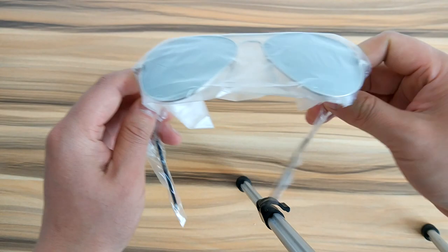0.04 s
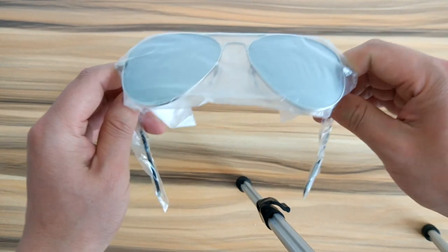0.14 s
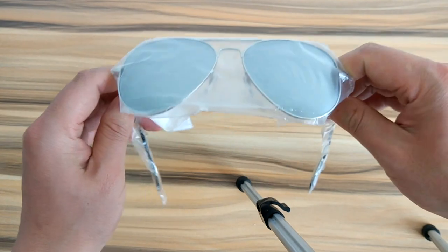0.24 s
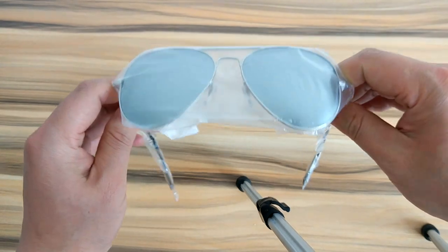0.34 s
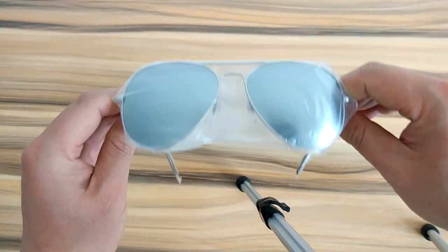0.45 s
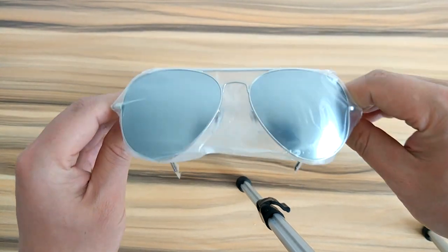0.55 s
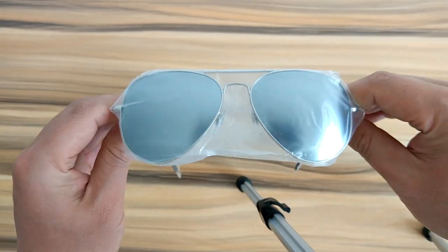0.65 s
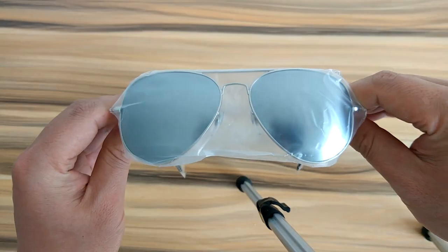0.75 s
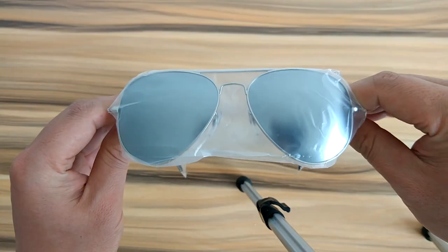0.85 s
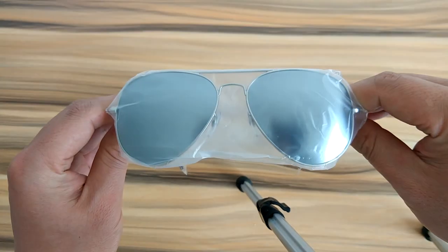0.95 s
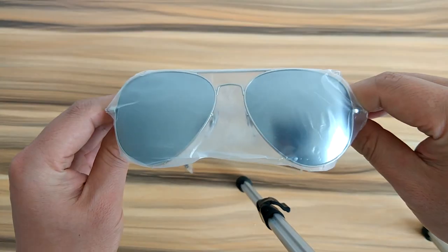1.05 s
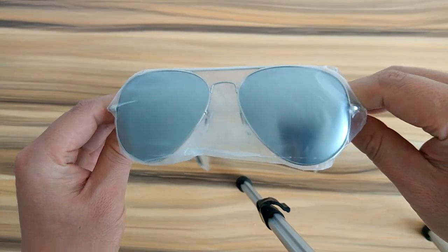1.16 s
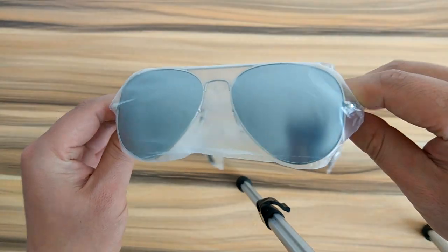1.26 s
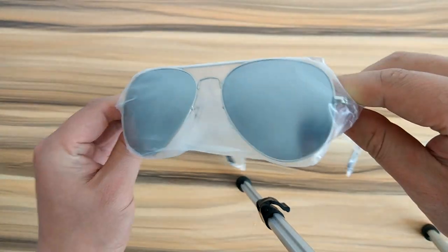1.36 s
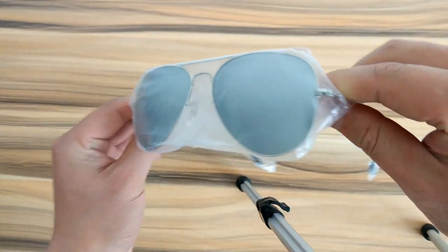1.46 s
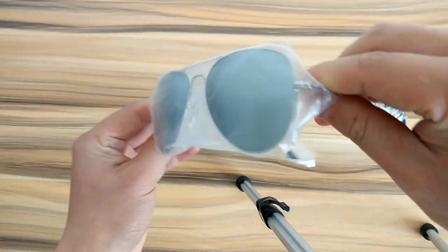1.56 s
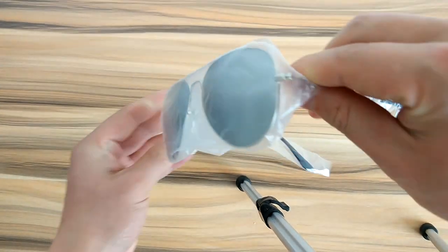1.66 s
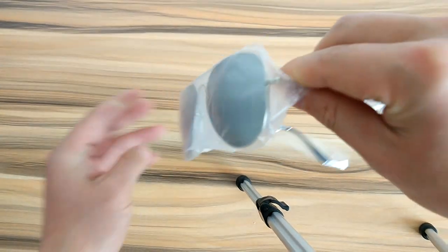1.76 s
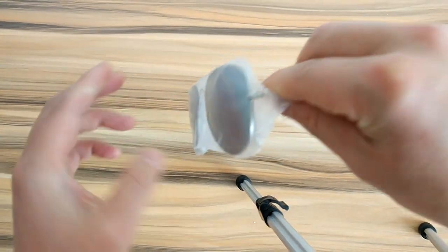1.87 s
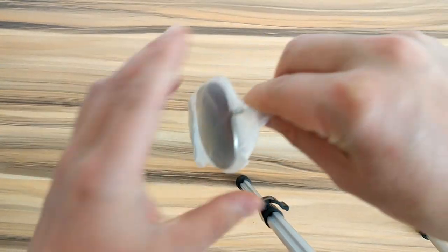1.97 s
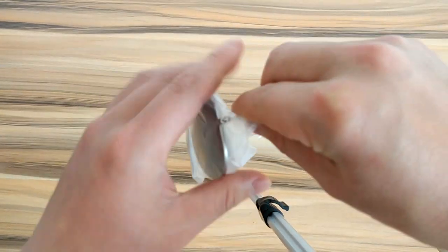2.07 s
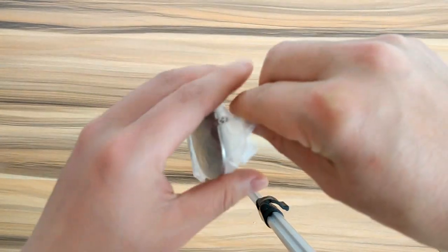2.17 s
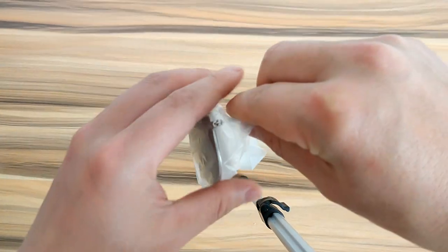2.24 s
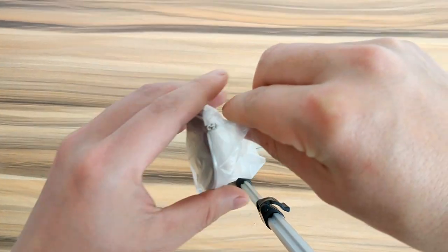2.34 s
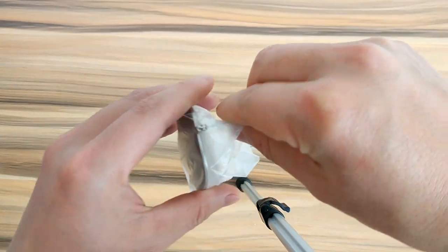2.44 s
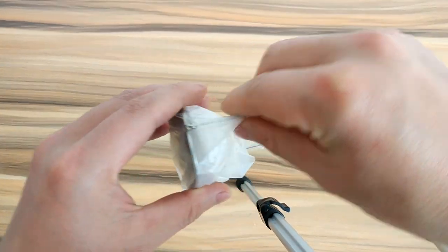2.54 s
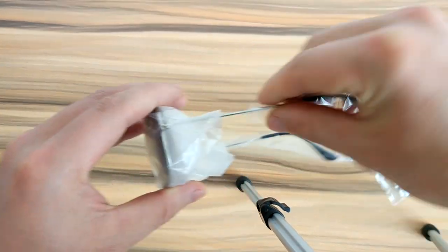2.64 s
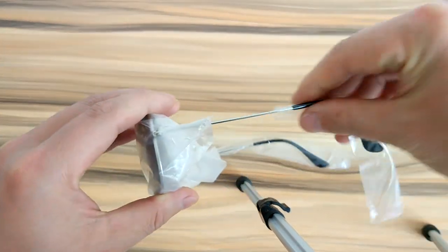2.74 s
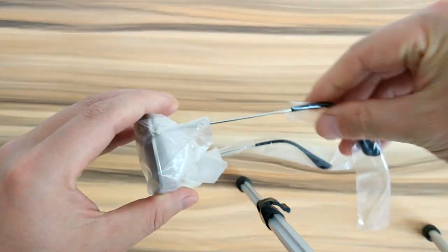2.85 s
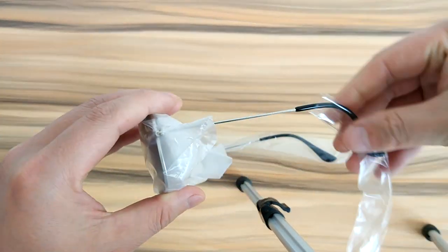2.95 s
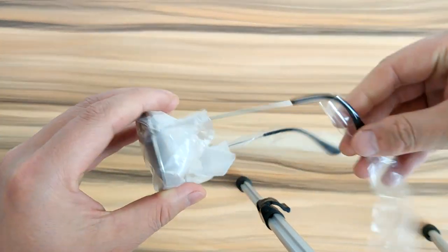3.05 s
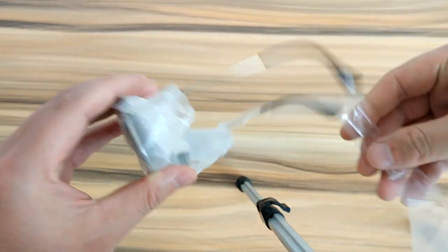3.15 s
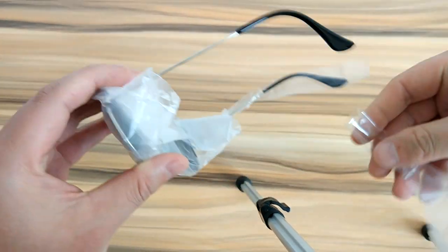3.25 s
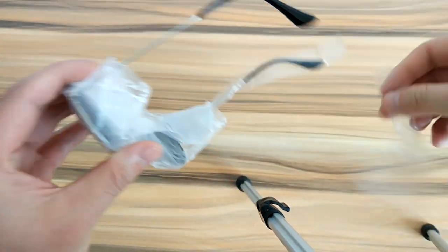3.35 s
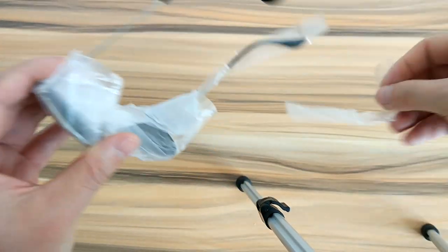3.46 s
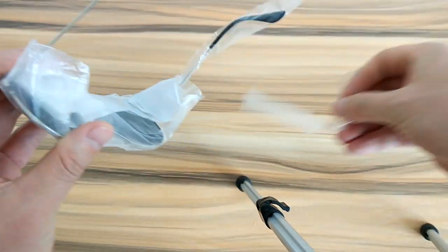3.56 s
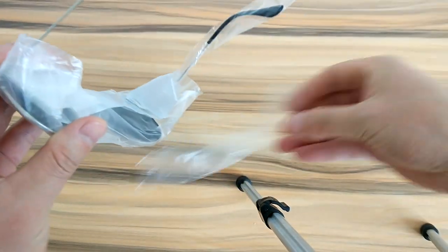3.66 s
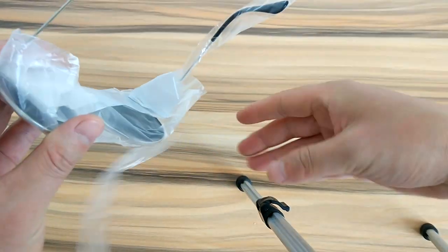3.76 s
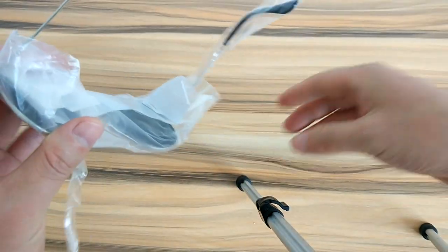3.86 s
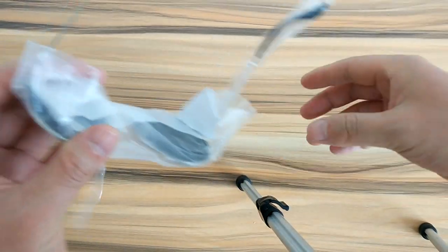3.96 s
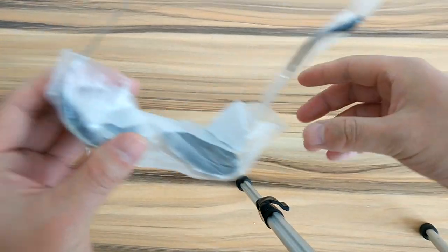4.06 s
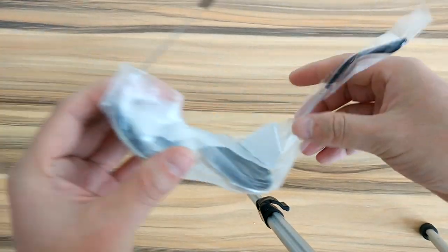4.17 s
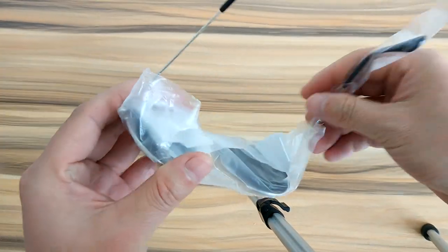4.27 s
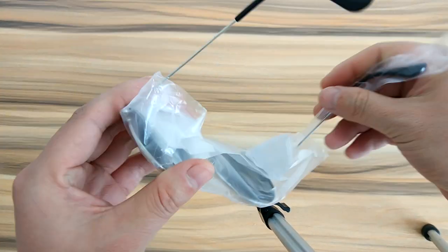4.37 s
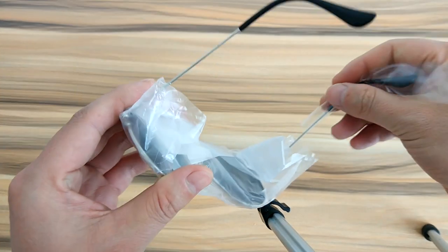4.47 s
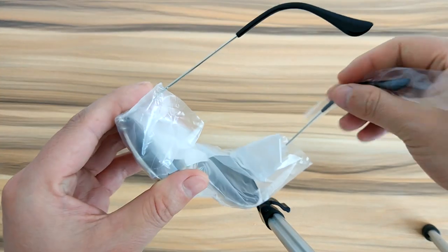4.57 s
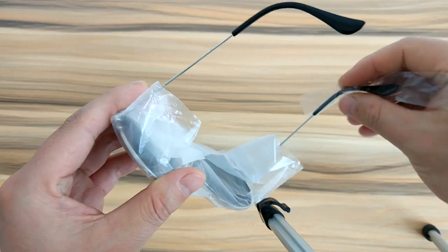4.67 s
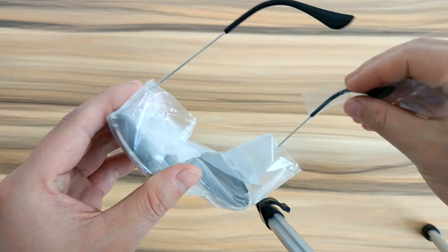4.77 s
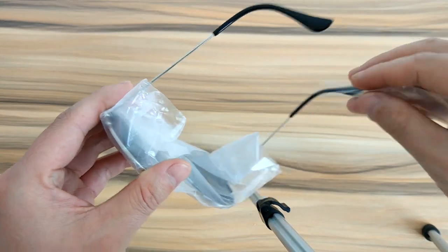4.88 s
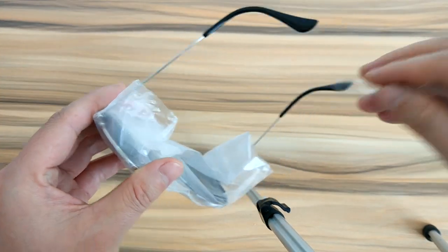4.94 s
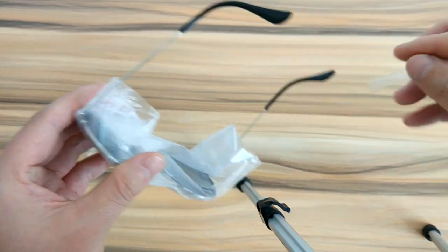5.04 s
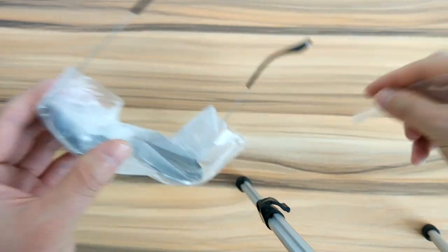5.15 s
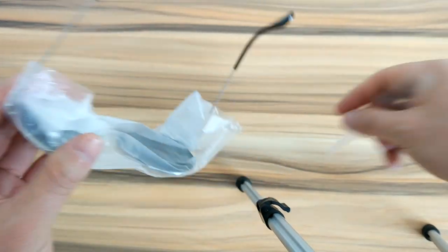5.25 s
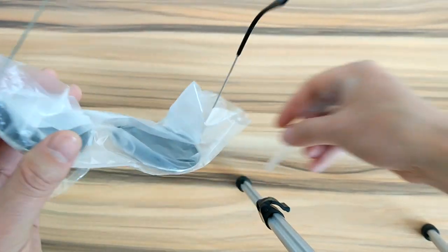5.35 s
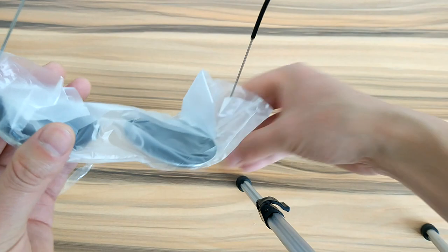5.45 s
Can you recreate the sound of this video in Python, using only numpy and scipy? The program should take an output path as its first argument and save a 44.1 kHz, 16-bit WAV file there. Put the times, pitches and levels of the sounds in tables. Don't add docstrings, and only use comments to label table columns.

```python
import sys
import numpy as np
from scipy import signal
from scipy.fft import rfft, irfft
from scipy.io import wavfile
from scipy.ndimage import uniform_filter1d

SR = 44100
rng = np.random.default_rng(int(sys.argv[2]) if len(sys.argv) > 2 else 0)


def unload_wav(signal):
    wavfile.write(
        sys.argv[1],
        SR,
        np.round(np.clip(np.atleast_2d(signal).T, -1, 1) * 32767).astype(np.int16),
    )


def ratio_of_db(decibels):
    return 10 ** (np.asarray(decibels, float) / 20)


N = 242991


def rms_one(x):
    return x / np.sqrt(np.mean(x ** 2) + 1e-20)


def peak_one(x):
    return x / np.abs(x).max()


def at_hz(points, hz):
    table_hz, values = np.transpose(points)
    return np.interp(np.log(hz), np.log(table_hz), values)


def drift(rate_hz):
    r = np.exp(-2 * np.pi * rate_hz / SR)
    return rms_one(signal.lfilter([1], [1, -2 * r, r * r], rng.standard_normal(N + SR))[SR:])


def passed(x, hz, kind, order=2):
    return signal.sosfilt(signal.butter(order, hz, kind, fs=SR, output="sos"), x)


def ring(hz, cycles, size):
    t = np.arange(size) / SR
    return np.sin(2 * np.pi * hz * t) * ratio_of_db(-60 * t * hz / cycles)


def add(out, s, piece):
    i = max(round(s * SR), 0)
    out[:, i:i + piece.shape[1]] += piece[:, :N - i]


def left_right(mid, side, alike):
    return np.sqrt(1 + alike) * mid + np.sqrt(1 - alike) * side * np.array([[1], [-1]])


# start_s, peak_db, dull_part_below_peak_db
UNFOLDING = [(0.0029, -24, -40), (0.0078, -23, -10), (0.0125, -22, -32), (0.0452, -17, -11),
             (0.0473, -25, -10), (0.0568, -18, -19), (0.0877, -17, -17), (0.1143, -18, -30),
             (0.1251, -14.5, -13.5), (0.1314, -25, -35), (0.1362, -12, -24), (0.1446, -16.5, -14),
             (0.1468, -19.5, -23), (0.1641, -15.5, -28), (0.1699, -13, -10), (0.1807, -21, -29),
             (0.1937, -20, -21), (0.1966, -28, -5), (0.2146, -32, -26), (0.2251, -36, -19),
             (0.2285, -27.0, -26), (0.2332, -24, -10), (0.2424, -21, -11.5), (0.2739, -12.5, -13.5),
             (0.294, -13.5, -11), (0.2988, -30, -8), (0.3167, -29.5, -28), (0.3716, -39, -32),
             (0.4258, -19, -15), (0.4407, -33, -31), (0.459, -35, -21), (0.4753, -21, -21),
             (0.4818, -23, -20), (0.4951, -36, -9), (0.5069, -32, -20), (0.5102, -26, -29),
             (0.5489, -23, -25), (0.5524, -23, -22), (0.562, -24, -28), (0.6107, -18.5, -15),
             (0.7187, -29, -12.5), (0.815, -24.5, -18), (0.8182, -38, -19), (0.8495, -34, -33),
             (0.8564, -34, -13), (0.8586, -28.5, -9.5), (0.871, -28, -27), (0.9017, -29, -28),
             (0.9037, -31, -24), (0.9103, -20, -19), (1.0006, -34, -12), (1.0349, -30, -6),
             (1.0798, -36.5, -9), (1.0943, -60, -16), (1.1021, -34, -3.5), (1.1172, -33.5, -4.5)]
TURNING = [(1.1797, -31, -5), (1.1871, -14, -9.5), (1.1956, -18, -35), (1.1997, -26.5, -23),
           (1.2287, -22.5, -11), (1.2422, -23, -10), (1.2499, -9.5, -36), (1.2629, -21.5, -3.5),
           (1.2664, -23, -15), (1.2929, -22, -29), (1.431, -34.5, -15), (1.447, -22.5, -10),
           (1.45, -27, -19), (1.4595, -37, -16), (1.496, -19.5, -12), (1.4966, -17.5, -5.5),
           (1.5005, -29, -17), (1.5295, -17, -23), (1.5355, -25, -29), (1.5468, -14, -29),
           (1.5485, -11.5, -31), (1.561, -19, -31), (1.5675, -39, -30), (1.5794, -16.5, -32),
           (1.5811, -20, -18), (1.594, -10.5, -39), (1.5973, -20, -15.5), (1.6086, -19, -23),
           (1.6818, -27.5, -9), (1.7118, -28, -35), (1.7257, -30, -41), (1.7282, -22, -44),
           (1.7344, -23, -18), (1.7696, -23.5, -11), (1.8326, -39, -18), (1.8599, -26, -3.5),
           (1.863, -33, -21), (1.9152, -19.5, -25), (1.9429, -26, -10.5), (2.071, -43, -20)]
GRIPPING = [(2.1278, -31, -12.5), (2.1504, -17, -26), (2.1528, -24, -19), (2.165, -35, 1.5),
            (2.1756, -37, -1), (2.186, -16.5, -35), (2.1906, -10, -15.5), (2.193, -27, -19),
            (2.204, -32, -14), (2.2387, -15, -15), (2.2693, -10, -24), (2.2863, -28, -33),
            (2.293, -22.5, -3), (2.3108, -18.5, -6), (2.402, -25, -8.5), (2.4113, -33, -28),
            (2.432, -20, -10.5), (2.475, -41, -35), (2.4784, -43, -23), (2.5014, -23.5, -32),
            (2.549, -30, -40), (2.5513, -22, -41), (2.561, -21, -40), (2.5748, -18, -10), (2.5861, -26, -6),
            (2.5975, -26, -31), (2.6002, -27, -29), (2.6102, -17, -18), (2.6217, -20.5, -5),
            (2.641, -21, -25), (2.651, -25, -5.5), (2.6617, -27, -15), (2.6655, -14.5, -8),
            (2.677, -25, -10), (2.718, -19, -30), (2.74, -25, -22), (2.7434, -22, -29), (2.7629, -18, -33),
            (2.77, -16, -32), (2.773, -20, -38), (2.7895, -18, -43), (2.794, -11.5, -37),
            (2.8028, -15, -36), (2.8449, -20, -31), (2.8617, -18.5, -30), (2.872, -19, -34),
            (2.8728, -23, -27), (2.9, -15.5, -24), (2.902, -21.5, -22), (2.908, -27, -14),
            (2.9222, -25.5, -12), (2.9399, -28, -34)]
FIRST_SLEEVE = [(3.022, -16, -30), (3.034, -28, -36), (3.039, -20.5, -40), (3.0484, -31.0, -34),
                (3.0673, -18, -16.5), (3.081, -24, -18), (3.0926, -19, -16), (3.1005, -15, -34),
                (3.114, -28.5, -13), (3.131, -34, -35), (3.1354, -14.5, -43), (3.1425, -18.5, -5.5),
                (3.1473, -27, -28), (3.162, -19.5, -31), (3.1787, -24, -21), (3.194, -18, -30),
                (3.2052, -14.5, -31), (3.2196, -31, -27), (3.2444, -21, -20), (3.253, -23, -19),
                (3.2666, -16.5, -22), (3.276, -27, -30), (3.2955, -22.5, -29), (3.2988, -18.5, -41),
                (3.3022, -33, -31), (3.3163, -21, -32), (3.3196, -31, -15), (3.353, -17, -26),
                (3.38, -36, -30), (3.385, -31, -26), (3.3947, -17, -31), (3.397, -24, -11.5),
                (3.4038, -21, -34), (3.4165, -24, -20), (3.4196, -36, -28), (3.456, -19.5, -31),
                (3.4662, -19, -42), (3.4747, -17.5, -16), (3.484, -17.5, -39), (3.4925, -20, -37),
                (3.4965, -19, -43), (3.5022, -26.0, -27), (3.516, -26, -15), (3.542, -29.5, -19),
                (3.5482, -21, -41), (3.5554, -29.5, -6.5), (3.5616, -25, -22), (3.5656, -22, -41),
                (3.5782, -16.5, -44), (3.586, -28, -20), (3.6012, -17, -50), (3.6056, -34, -26),
                (3.6882, -25, -38), (3.7255, -29, -16.5), (3.732, -18.5, -34), (3.7369, -20, -18),
                (3.746, -34, -32), (3.75, -34, -17), (3.7647, -12, -22), (3.7675, -22.5, -12)]
REGRIP = [(4.0559, -38, -26), (4.1062, -22.5, -20), (4.1115, -21, -15), (4.114, -27, -24),
          (4.1232, -36, -32), (4.2775, -22.5, -28), (4.2799, -35, -19), (4.2889, -17.5, -11),
          (4.3283, -31.5, -9), (4.3594, -25.5, -17), (4.387, -28, -27), (4.3912, -20.5, -13.5),
          (4.393, -23, -10), (4.433, -41, 1), (4.4384, -18, -31), (4.4461, -22, -15), (4.4503, -21.5, -8),
          (4.4758, -19, -7.5), (4.487, -31, -19), (4.516, -27, -21), (4.5198, -23, -16),
          (4.5222, -15.0, -21), (4.53, -18.5, -36), (4.561, -14.5, -20), (4.564, -20.5, -9),
          (4.5939, -22, -11.5), (4.6182, -27, -30), (4.6216, -32, -19), (4.6382, -24.5, -28),
          (4.651, -30, -10), (4.6626, -20.5, -26), (4.666, -30, -20), (4.6774, -20.5, -19),
          (4.679, -26, -13), (4.6923, -16.5, -27), (4.698, -28, -36), (4.707, -22, -18),
          (4.7134, -20, -8.5), (4.715, -27, -6), (4.739, -24, -29)]
SECOND_SLEEVE = [(4.7861, -15.5, -37), (4.8027, -28, -39), (4.8473, -13.5, -30), (4.854, -16, -46),
                 (4.8725, -28, -32), (4.8786, -18, -17), (4.8907, -16, -34), (4.8947, -17, -26),
                 (4.9006, -19, -31), (4.914, -17, -23), (4.9175, -22, -9), (4.919, -12, -22),
                 (4.929, -16.5, -37), (4.933, -25, -26), (4.9406, -22.5, -8), (4.9493, -17.5, -27),
                 (4.9608, -16, -41), (4.9694, -14, -24), (4.973, -14.5, -36), (4.977, -15.5, -40),
                 (4.9916, -22, -25), (5.0289, -33, -37), (5.0525, -19, -33), (5.0646, -11.5, -38),
                 (5.079, -28.0, -34), (5.086, -22, -28), (5.1495, -20, -16), (5.1794, -32, -19),
                 (5.182, -23, -41), (5.1905, -26, -20), (5.2337, -32, -10), (5.2642, -32, -41),
                 (5.2666, -32, -26), (5.28, -30, -28), (5.284, -29.5, -32), (5.297, -34, -1),
                 (5.2997, -41, -18), (5.3232, -31.5, -22), (5.3582, -29, -21), (5.3803, -22.5, -25)]
TAUT = [.294, .5524, .9103, 1.0349, 1.5293, 1.5615, 1.8599, 2.2386, 2.6217, 2.9, 3.022, 3.081, 3.0924,
        3.1006, 3.1422, 3.1939, 3.2955, 3.456, 3.5661, 3.6883, 3.7258, 3.751, 3.7649, 4.1118, 4.2772,
        4.6965, 4.9406, 5.0647, 5.1495, 5.182]
# delay_s, level_db
TABLE_ECHOES = [
    (.0013, -11),
    (.0027, -28),
    (.006, -31),
]


def snaps(crack_db=6, rise_s=.0007, fall_s=.0045, dull_db=1.0, tear_s=.0022, dull_tear_db=-22.5):
    lead_s = .0009
    tear_db, tear_spread_db = -17, 0.5
    taut_hz, taut_db, taut_faster = 8400, 1, 4
    rows = UNFOLDING + TURNING + GRIPPING + FIRST_SLEEVE + REGRIP + SECOND_SLEEVE
    out, t = np.zeros((2, N)), np.arange(900) / SR
    tearing = t / tear_s * np.exp(1 - t / tear_s * 2)
    noise = rng.standard_normal((len(rows), 3, 2, 900))
    chance = rng.random((len(rows), 5, 2))
    starts = np.array(rows)[:, 0]
    is_taut = np.isin(np.arange(len(rows)), [np.abs(starts - s).argmin() for s in TAUT])

    for (s, db, dull_rel_db), (sharp, torn, lumps), luck, taut in zip(rows, noise, chance, is_taut):
        speed = taut_faster if taut else 3.5 ** (luck[0, 1] - .6)
        pace = speed * (t - lead_s)
        shape = np.clip(pace / rise_s, 0, 1) ** 2 * ratio_of_db(-60 * np.maximum(pace - rise_s, 0) / fall_s)
        heard = np.abs(port(sharp[0] * shape))
        crack = sharp * shape / heard.max()

        burst = crack.copy()
        for (lag_s, echo_db), (late, _) in zip(TABLE_ECHOES, luck):
            lag = round(lag_s * (1.1 + 2.0 * late) * SR)
            burst[:, lag:] += ratio_of_db(echo_db) * crack[:, :-lag]

        torn = torn * ratio_of_db(22. * uniform_filter1d(lumps[0], size=25))
        torn_db = tear_db + tear_spread_db * (2 * luck[4, 0] - 2.5)
        burst += ratio_of_db(torn_db) * tearing * torn / np.std(port(torn[0]))

        bright_hz = taut_hz if taut else 9600 * 1.45 ** luck[3, 0]
        dull_hz = 2600 * 1.7 ** luck[3, 1]
        bright = passed(burst, [bright_hz / 1.4, bright_hz * 1.4], "band", order=1 + taut)
        bright = bright * ratio_of_db([[0], [1]])
        bright = bright / np.abs(port(bright[0])).max()
        dull = passed(burst + ratio_of_db(dull_tear_db) * tearing * torn, [dull_hz / 1.78, dull_hz * 2.0], "band")
        dull = peak_one(dull) * ratio_of_db([[-2], [1]])
        snap = ratio_of_db(db + crack_db + taut * taut_db) * bright + ratio_of_db(db + dull_rel_db + dull_db) * dull
        add(out, s - heard.argmax() / SR, snap)
    return out


def grains(per_s, spread_db, clump_db, pitches, cycles, apart):
    born = rng.random(N) < per_s * ratio_of_db(clump_db * drift(35)) / SR
    sizes = born * ratio_of_db(spread_db * np.minimum(rng.exponential(1, N), 4))
    clicks = sizes * rng.standard_normal((2, N))
    dealt = rng.integers(0, len(pitches), N)
    clicks[1] = np.sqrt(1.6 - apart ** 2) * clicks[0] + apart * clicks[1]
    out = 0
    for k, hz in enumerate(pitches):
        r, w = ratio_of_db(-60 * hz / cycles / SR), 2 * np.pi * hz / SR
        struck = clicks * (dealt == k) + 1e-18
        out = out + signal.lfilter([1], [1, -2 * r * np.cos(w), r * r], struck) * np.sin(w)
    return rms_one(out)


# start_s, length_s, level_db
CRUNCHES = [(0.099, 0.0055, -37), (0.1343, 0.014, -32.5), (0.16, 0.011, -29), (0.214, 0.027, -35),
            (0.291, 0.0081, -32), (0.42, 0.028, -45), (0.469, 0.031, -38.5), (0.505, 0.0095, -38.5),
            (0.543, 0.036, -41.5), (0.604, 0.023, -44), (1.1785, 0.027, -41.0), (1.26, 0.0081, -48),
            (1.488, 0.016, -33), (1.535, 0.019, -34), (1.7335, 0.012, -43), (2.1755, 0.037, -34),
            (2.233, 0.013, -27), (2.265, 0.042, -30), (2.5705, 0.034, -36.5), (2.641, 0.026, -30.5),
            (2.708, 0.014, -44), (2.766, 0.018, -42), (2.774, 0.025, -39), (2.957, 0.015, -35.5),
            (3.02, 0.012, -38), (3.039, 0.011, -42), (3.083, 0.027, -44), (3.133, 0.025, -36),
            (3.197, 0.02, -34), (3.245, 0.028, -36.5), (3.293, 0.013, -37), (3.4566, 0.05, -39),
            (3.599, 0.007, -41.5), (3.727, 0.029, -39), (3.7614, 0.008, -34), (3.807, 0.02, -37),
            (4.124, 0.13, -47.5), (4.271, 0.036, -46), (4.376, 0.01, -44), (4.443, 0.0083, -46),
            (4.526, 0.034, -40), (4.564, 0.016, -33.5), (4.673, 0.014, -35.5), (4.688, 0.031, -43),
            (4.787, 0.0065, -38.5), (4.835, 0.0076, -42.5), (4.873, 0.044, -35.5), (4.955, 0.032, -33),
            (5.176, 0.019, -40.5)]


def crunches(level_db=0.5, edge_s=.0023):
    t, gate = np.arange(N) / SR, np.zeros(N)
    for s, length_s, db in CRUNCHES:
        now = slice(round(s * SR), round((s + length_s) * SR))
        to_edge_s = np.minimum(t[now] - s, (s + length_s - t[now]) / 2)
        gate[now] += ratio_of_db(db + level_db) * np.clip(to_edge_s / edge_s, 0, 1)
    pitches = np.geomspace(3000, 14000, 12)
    film = grains(4000, spread_db=2.5, clump_db=2.5, pitches=pitches, cycles=1.02, apart=0.94)
    return gate * film / np.std(port(film[0]))


# time_s, stretch_db, finger_pressure_db
HANDLING = [(0.0, -27.5, -52), (0.07, -32.5, -75), (0.63, -54, -59), (0.97, -56.5, -63), (1.6, -39, -56.5),
            (1.93, -55, -61), (2.19, -55, -54), (2.32, -44, -53), (2.78, -32.5, -55), (2.89, -47.5, -75),
            (3.35, -42, -58.5), (3.74, -52, -61), (3.88, -50, -75), (4.1, -66, -56.5), (4.47, -38, -53.5),
            (4.6, -43, -63.5), (4.94, -39.5, -55), (5.51, -57.5, -60.5)]


def rustle(fine_db=-12.5, rub_db=-8):
    s, *controls = np.transpose(HANDLING)
    strain, pressure = (np.interp(np.arange(N) / SR, s, db) for db in controls)
    high, low = np.geomspace(4000, 14000, 12), np.geomspace(420, 3600, 12)
    crackle = grains(2500, spread_db=1.0, clump_db=6.5, pitches=high, cycles=1.56, apart=1.17)
    rubbing = grains(1400, spread_db=4.5, clump_db=4.0, pitches=low, cycles=4.2, apart=1.0)
    return ratio_of_db(strain + fine_db) * crackle + ratio_of_db(pressure + rub_db) * rubbing


# start_s, peak_db, pitch_hz
POPS = [(0.07, -34.5, 1200), (0.169, -31, 890), (0.168, -27.5, 2940), (0.269, -41, 3130),
        (0.2964, -28, 925), (0.91, -39, 2780), (1.164, -42, 2830), (1.186, -32.5, 2650), (1.446, -43, 2560),
        (1.493, -34, 2440), (1.858, -37, 2380), (2.152, -53, 3010), (2.181, -36, 1840), (2.236, -39, 2200),
        (2.269, -31.5, 1770), (2.429, -39, 826), (2.558, -34.5, 810), (2.627, -24.5, 2840),
        (2.663, -27, 1050), (3.021, -34.5, 2950), (3.091, -39, 1110), (3.142, -46, 3450),
        (3.475, -39, 2640), (3.733, -42, 1930), (3.767, -44, 850), (4.104, -35, 2340), (4.288, -33, 1220),
        (4.357, -37, 2770), (4.561, -39, 2680), (4.711, -43, 2800)]
# start_s, peak_db, pitch_hz
MORE_POPS = [(0.008, -39, 2780), (0.041, -33, 1130), (0.425, -45.5, 900), (0.548, -48, 2980),
             (1.291, -34, 3320), (1.577, -38, 880), (2.29, -39, 2500), (2.4, -44, 890), (2.446, -43, 2300),
             (2.574, -33.5, 810), (2.584, -36, 2470), (2.713, -37, 2660), (2.844, -43, 1050),
             (3.268, -35, 3350), (3.815, -40.5, 2900), (4.399, -35, 3180), (4.445, -47, 3120),
             (4.473, -33.5, 1580), (4.879, -61, 2540), (4.928, -34, 1090), (5.19, -41, 2250)]


def pops(cycles=9.0, grit=0.24, grit_s=.037):
    out, t = np.zeros((2, N)), np.arange(900) / SR
    rows = POPS + MORE_POPS
    noise = rng.standard_normal((len(rows), 3, 900))
    swell = 1 - np.exp(-(t / .0011) ** 2)
    for (s, db, hz), (shared, left, right) in zip(rows, noise):
        rough = shared + 0.69 * np.array([left, right])
        edge = passed(rough, [500, 4000], "band", order=1) * ratio_of_db(-60 * t / grit_s)
        pop = peak_one(swell * (ring(hz, cycles, size=900) + grit * edge))
        add(out, s - .0003, ratio_of_db(db) * pop)
    return out


# start_s, peak_db, pitch_hz
BUMPS = [
    (0.296, -38, 350),
    (0.549, -41.5, 410),
    (2.234, -41.5, 342),
    (2.425, -44, 370),
    (2.659, -27, 400),
    (3.201, -40.5, 315),
    (4.105, -49, 301),
    (4.235, -37.5, 393),
    (4.394, -35.5, 513),
    (4.559, -42, 332),
]


def bumps(cycles=7.0):
    out = np.zeros((2, N))
    swell = 1 - np.exp(-np.arange(3000) / SR / .00075)
    for s, db, hz in BUMPS:
        add(out, s, ratio_of_db(db) * (swell * ring(hz, cycles, size=3000))[None])
    return out


# pitch_hz, fade_s
ROOM = [(300, 0.11), (1500, 0.55), (5000, 0.47), (12000, 0.33)]
# pitch_hz, share_0_to_1
LIKENESS = [(60, .7), (250, .92), (600, .8), (1400, .35), (3000, 0)]


def room(x, count=8, room_db=-6, gap_s=.006):
    t, out, step = np.arange(SR) / SR, np.zeros((2, N + SR)), N // count + 1
    for start in range(0, N, step):
        (mid, side), tail = rng.standard_normal((2, SR)), 0
        for low in 150 * 2. ** np.arange(7):
            both = left_right(mid, side, np.clip(at_hz(LIKENESS, 1.4 * low), 0, 1))
            octave = passed(both, [low, min(2 * low, .45 * SR)], "band")
            tail = tail + octave * ratio_of_db(-60 * t / at_hz(ROOM, 2.6 * low))
        tail = tail * np.clip(t / gap_s - 1, 0, 1)
        tail = tail / np.sqrt(np.sum(tail ** 2) / 2)
        wet = signal.fftconvolve(x[:1, start:start + step], tail, axes=1)
        out[:, start:start + wet.shape[1]] += ratio_of_db(room_db) * wet
    return passed(out[:, :N], 10950, "low")


# start_s, end_s, from_hz, to_hz, level_db
WHINES = [
    (0.699, 1.043, 425, 497, -71.5),
    (5.43, 5.566, 917, 985, -63.5),
]


def whines():
    out = np.zeros((2, N))
    for start, end, from_hz, to_hz, db in WHINES:
        hz = np.linspace(from_hz, to_hz, round((end - start) * SR))
        tone = np.hanning(len(hz)) * np.sin(2 * np.pi * np.cumsum(hz) / SR)
        add(out, start, (ratio_of_db(db + 4.4 * drift(15)[:len(hz)]) * tone)[None])
    return out


# pitch_hz, level_db (per Hz)
HUM = [(30, 11), (110, 3), (190, 11.5), (370, 7), (600, -3.5), (900, -8), (4000, -3), (14000, -23)]


def hum(level_db=-67.5):
    hz = np.maximum(np.arange(N // 2 + 1) * SR / N, 20)
    mid, side = rfft(rng.standard_normal((2, N)))
    both = left_right(mid, side, np.clip(at_hz(LIKENESS, hz), 0, 1))
    steady = rms_one(irfft(both * ratio_of_db(at_hz(HUM, hz)), N))
    bass = passed(steady, 1040, "low", order=1)
    return ratio_of_db(level_db) * (steady + (ratio_of_db(3 * drift(5)) - 1) * bass)


def scene():
    bright = passed(snaps() + rustle() + crunches(), 218, "high")
    low = passed(pops() + bumps(), 190, "high")
    near = bright + low
    near = near - 0.56 * passed(near, [520, 740], "band", order=1)
    near = np.array([near[0], np.roll(near[1], 3)])
    return near + room(bright + ratio_of_db(-10) * low) + hum() + whines()


def port(x, hz=11680, width_hz=2640, level_db=21):
    r, w = np.exp(-np.pi * width_hz / SR), 2 * np.pi * hz / SR
    cavity = signal.lfilter((1 - r * r) / 2 * np.array([1, 0, -1]), [1, -2 * r * np.cos(w), r * r], x)
    return x + ratio_of_db(level_db) * cavity


def top_cut(x):
    return signal.sosfilt(signal.butter(12, 16450, fs=SR, output="sos"), x)


def record(dry):
    x = passed(dry, 190, "high") + ratio_of_db(-18) * dry
    x = np.array([port(x[0]), passed(x[1], 10700, "low", order=1)])
    below, above = (signal.sosfilt(signal.ellip(10, 1, 70, 14350, kind, fs=SR, output="sos"), x)
                    for kind in ("low", "high"))
    fast, slow = uniform_filter1d(x[0] ** 2, size=130), uniform_filter1d(x[0] ** 2, size=1800)
    opened = uniform_filter1d(np.clip(fast / slow - 3.0, 0, 1), size=260)
    mix = below + ratio_of_db(-9.5) * opened * passed(above, 15200, "low", order=8)
    return top_cut(mix)


dry = scene()
out = record(dry)
unload_wav(out)
```